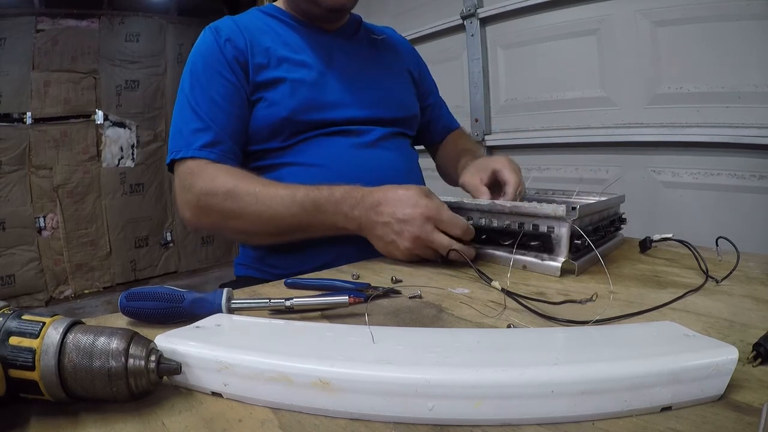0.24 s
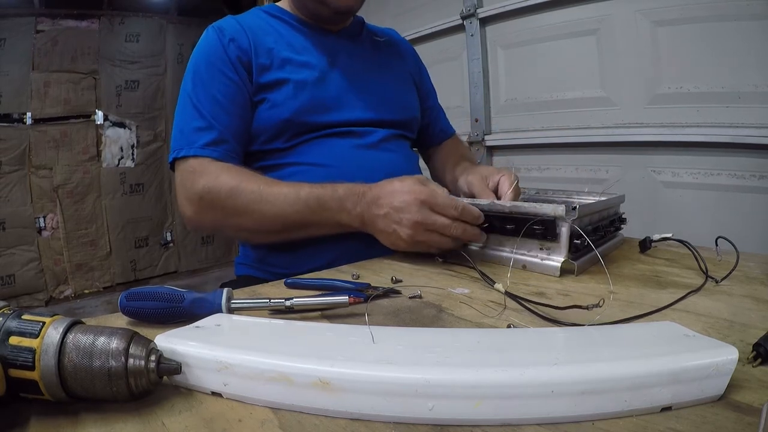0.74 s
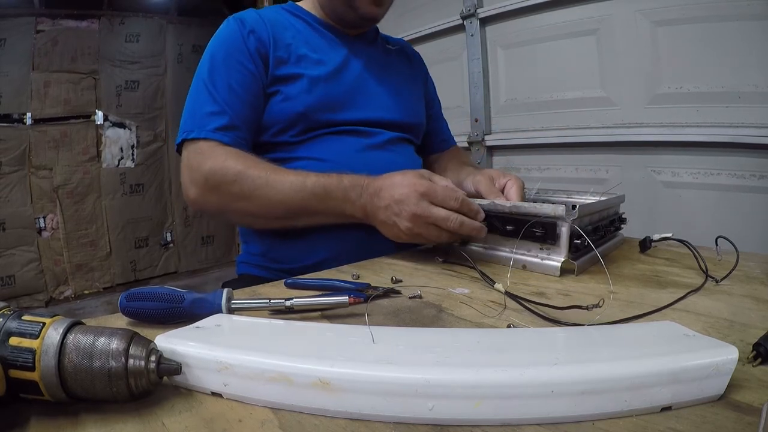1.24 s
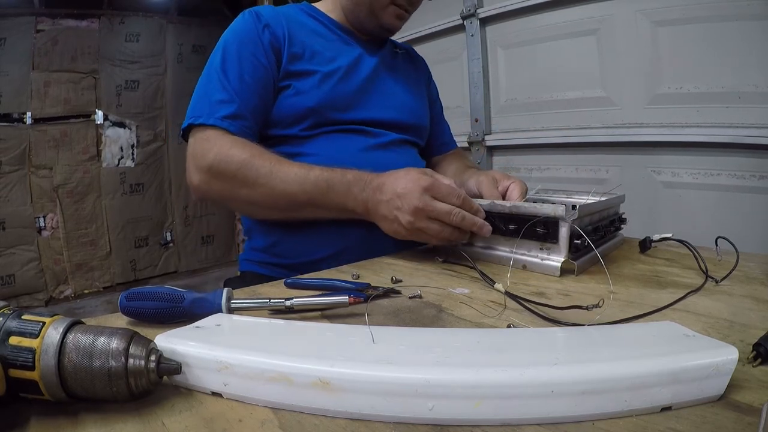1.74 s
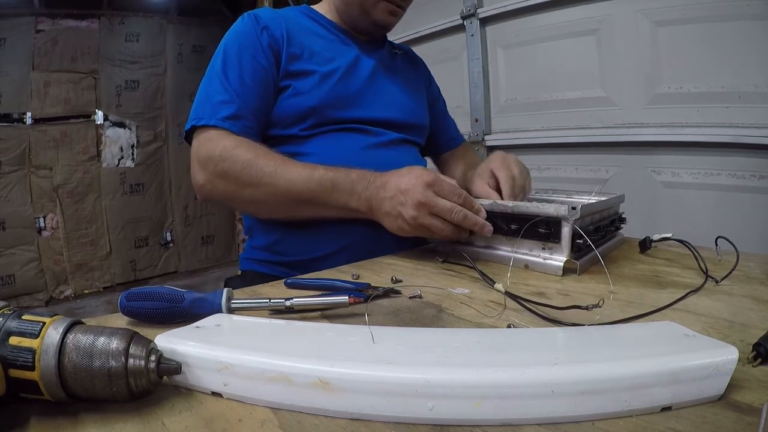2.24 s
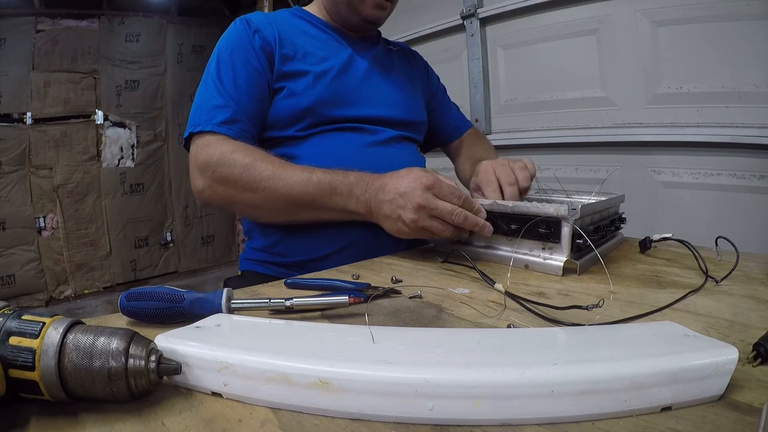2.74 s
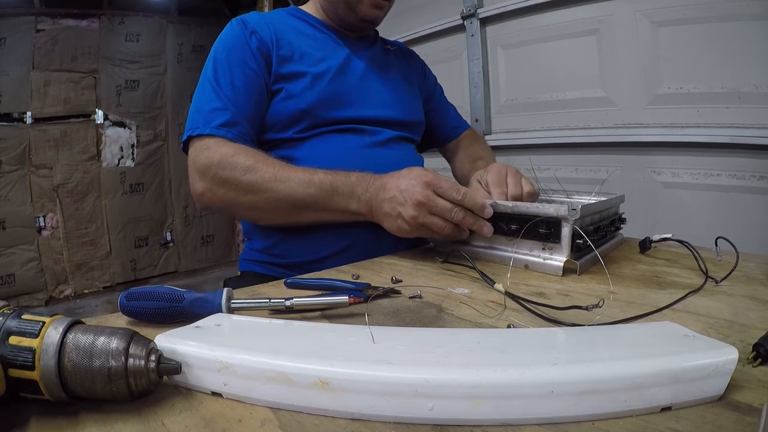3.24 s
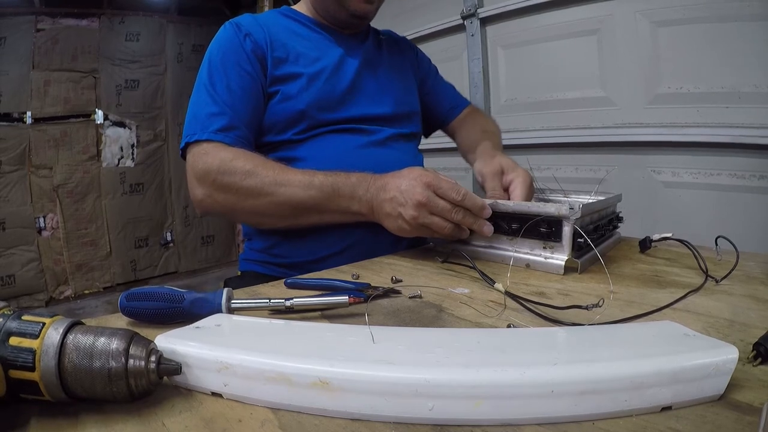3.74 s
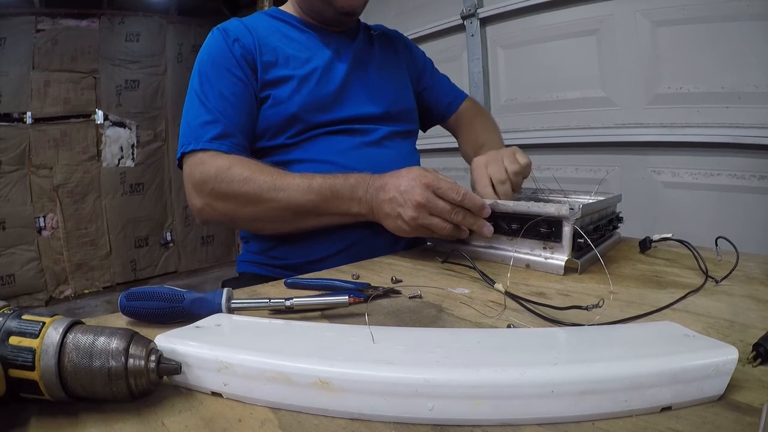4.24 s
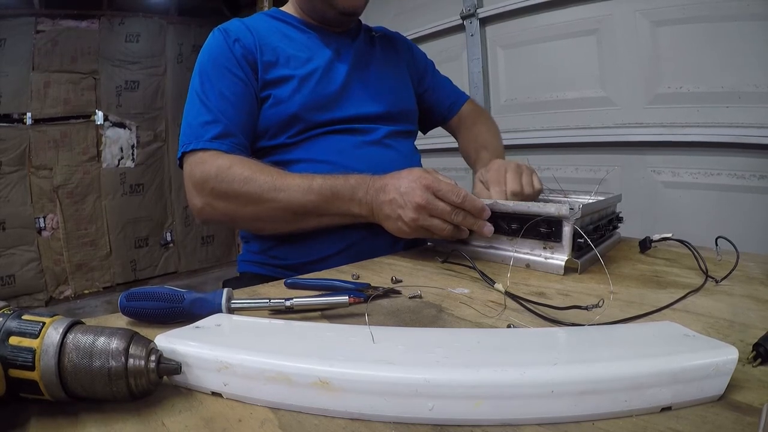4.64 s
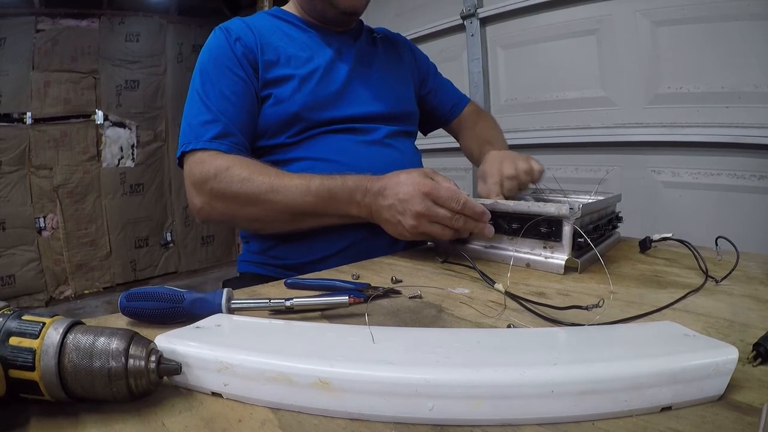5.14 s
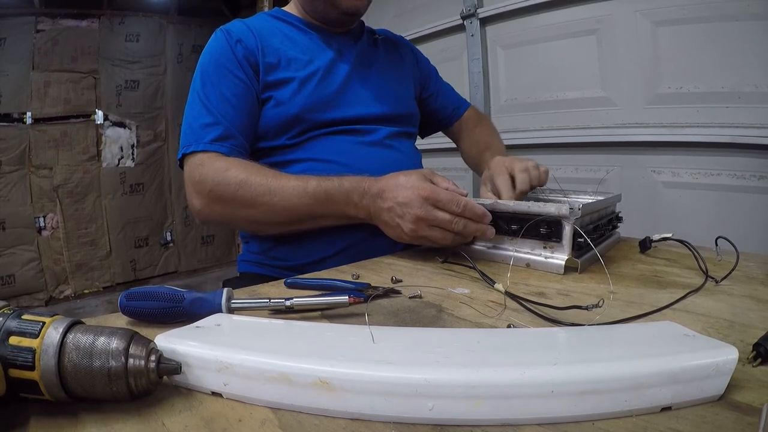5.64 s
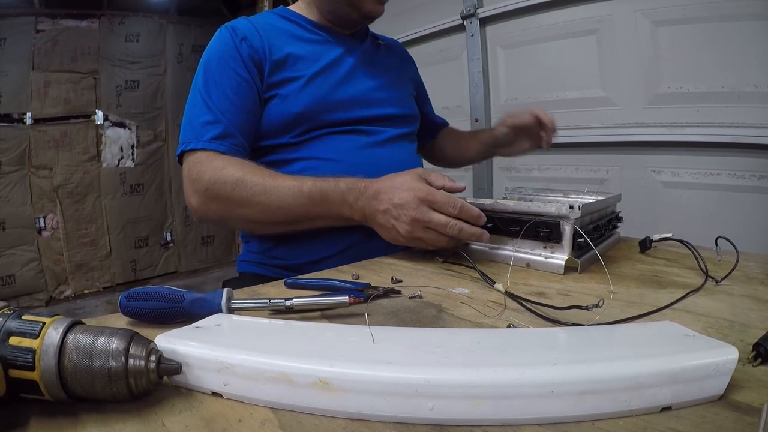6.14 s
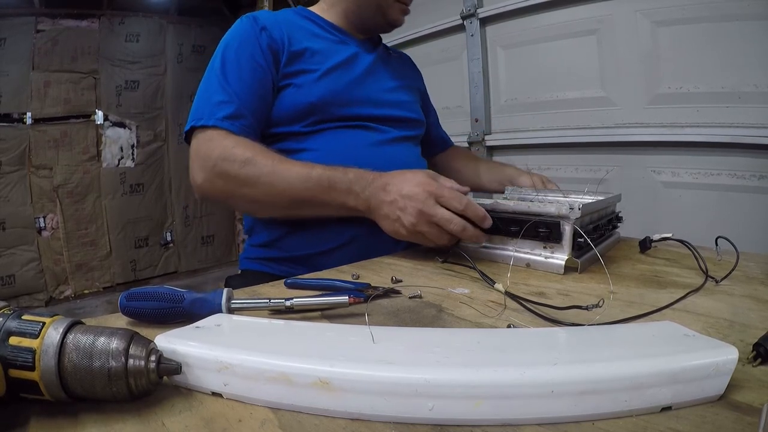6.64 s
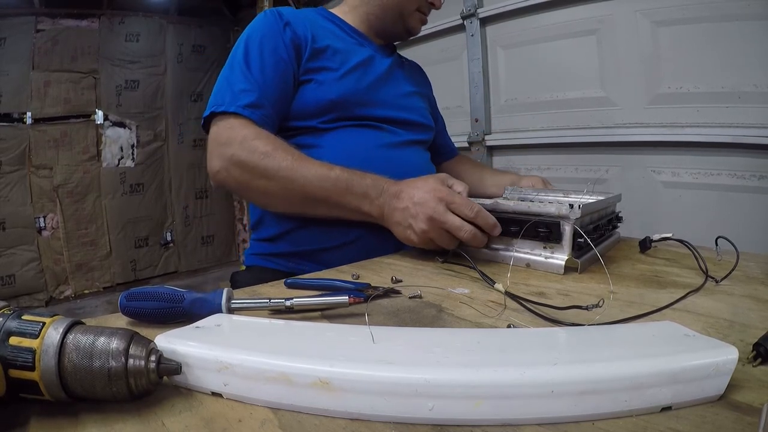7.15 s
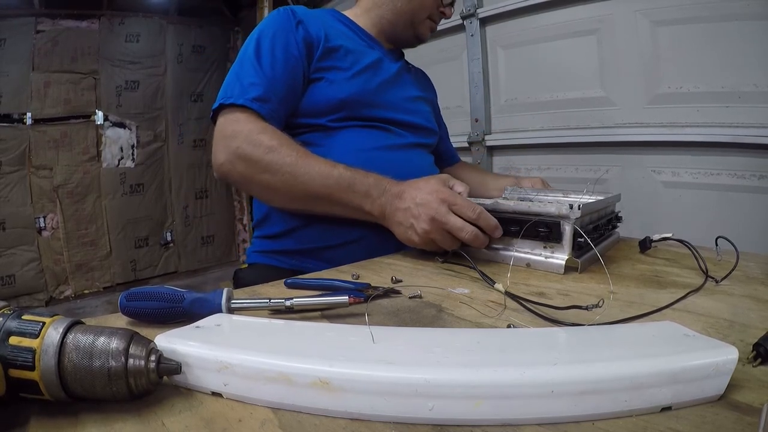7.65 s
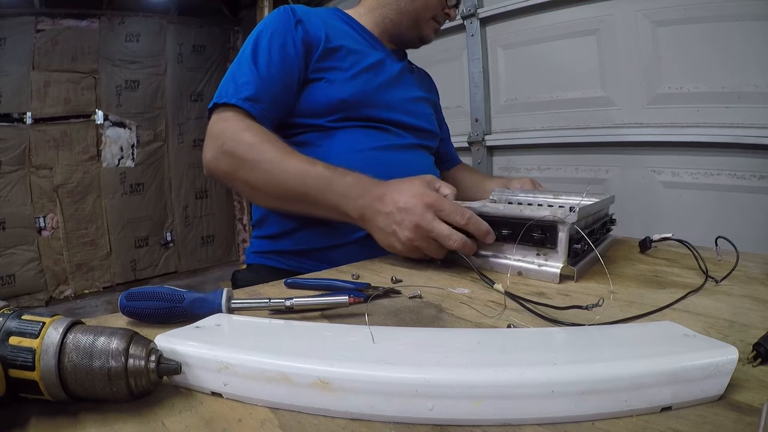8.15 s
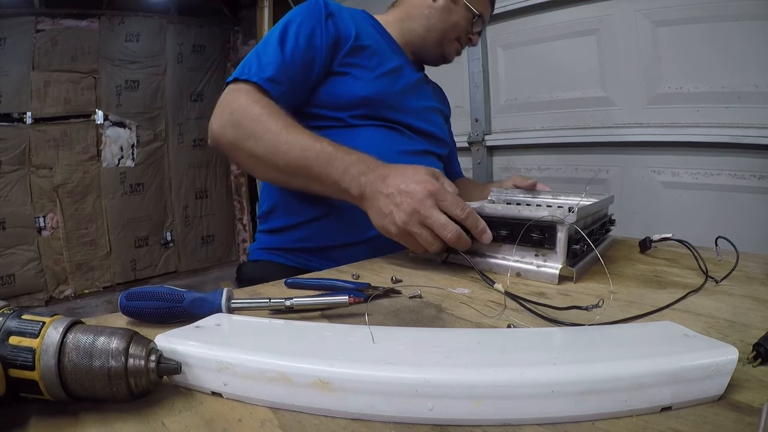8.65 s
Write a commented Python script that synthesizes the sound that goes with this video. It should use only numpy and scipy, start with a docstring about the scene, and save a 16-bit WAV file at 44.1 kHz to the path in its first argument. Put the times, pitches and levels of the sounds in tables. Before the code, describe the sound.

Thin wire and fingers scrape and click on a ringing metal grid box, with soft wooden bench thuds and a late humming drag in a garage.

```python
"""Hands thread thin wire through a metal grid box on a wooden bench in a closed garage.
Wire and skin rub the grid (dense random slips) and click on it (noise cracks), both ringing its modes.
The box bumps on the bench (decaying bench modes) and late on is dragged across it (wavering hum, rumble).
A faint squeak and a faint hum come and go; a low rumble and a faint hiss (coloured noise) lie below.
The two ports of a small microphone on the bench hear it all, with short diffuse echoes."""
import sys
import numpy as np
from scipy import signal
from scipy.fft import rfft, irfft, next_fast_len
from scipy.io import wavfile
from scipy.ndimage import uniform_filter1d, minimum_filter1d, map_coordinates

SR = 44100
rng = np.random.default_rng(int(sys.argv[2]) if len(sys.argv) > 2 else 0)


def output_pcm(signal):
    """Save a mono or channel-first signal as 16-bit PCM at the path in sys.argv[1].

    Samples are clipped to [-1, 1] before scaling.
    """
    pcm = np.clip(np.atleast_2d(signal).T, -1, 1) * 32767
    wavfile.write(sys.argv[1], SR, np.round(pcm).astype(np.int16))


N = 392049
SIZE = next_fast_len(N + SR)
HZ = np.maximum(np.arange(SIZE // 2 + 1) * SR / SIZE, 1)   # frequency axis of the long filters

# Modes of the metal grid box. Each row: frequency in Hz, nominal width in Hz, relative level in dB.
GRID_MODES = [(1035, 14, -5), (1085, 14, -2), (1265, 30, -6), (1545, 26, 1), (1600, 30, 0), (1750, 22, 1),
              (1935, 18, 1), (1988, 20, -5), (2310, 30, -9), (2685, 16, 0), (2790, 25, -4), (3090, 30, -3),
              (3255, 24, -4), (3330, 90, -4), (3420, 22, -4), (3478, 18, -4), (3770, 24, -1),
              (4230, 18, -3), (4520, 45, -2), (4755, 16, -5), (5070, 30, -8), (5230, 26, -7),
              (5450, 27, -9), (6025, 30, -2), (6082, 22, -2), (6245, 40, -3), (6420, 45, -6),
              (6850, 50, -1), (7280, 30, 0), (7700, 70, 0), (8430, 100, 0), (9240, 69, 3),
              (10030, 43, -2.5)]
# Modes of the wooden bench top. Each row: frequency in Hz, nominal width in Hz, relative level in dB.
BENCH_MODES = [(266.4, 14, 0.5), (320.3, 65, 4), (365.2, 75, 3), (446.4, 27, 7), (493.5, 80, 5.5)]
# The whole bench shuddering on its legs. Each row: frequency in Hz, width in Hz, relative level in dB.
LEG_MODES = [(73, 4.4, -23), (160, 4.8, -11)]


def amp(db):
    """Decibels to gain."""
    return 10 ** (np.asarray(db) / 20)


def unit(x):
    """Scaled to rms 1."""
    return x / np.sqrt(np.mean(x ** 2) + 1e-20)


def in_time(rows):
    """Columns of a curve table, one value per sample."""
    s, *columns = np.transpose(rows)
    return [np.interp(np.arange(N) / SR, s, c) for c in columns]


def at_hz(points, hz, column=1):
    """A spectrum table read on a log-frequency axis."""
    points = np.array(points, float)
    return np.interp(np.log(hz), np.log(np.maximum(points[:, 0], 1)), points[:, column])


def shaped(x, response):
    """x through a frequency response given on HZ."""
    return irfft(rfft(x, SIZE) * response, SIZE)[..., :N]


def split(x, low_hz, high_hz):
    """One band of x."""
    return signal.sosfilt(signal.butter(2, [low_hz, high_hz], "band", fs=SR, output="sos"), x)


def drift(rate):
    """Slow chance: random steps of spread 1, rate per second, joined by straight lines."""
    steps = rng.standard_normal(int(N / SR * rate) + 2)
    return np.interp(np.arange(N) / SR * rate, np.arange(len(steps)), steps)


def add(track, s, sound):
    """Mix a sound in at time s."""
    i = int(s * SR)
    track[i:i + len(sound)] += sound[:N - i]


def ring(x, hz, width):
    """One resonance, gain 1 on top."""
    r, w = np.exp(-np.pi * max(width, 3) / SR), 2 * np.pi * hz / SR
    return signal.lfilter([(1 - r * r) / 2, 0, (r * r - 1) / 2], [1, -2 * r * np.cos(w), r * r], x)


def background():
    """Coloured noise, mid and side unrelated, in four bands that waver in level."""
    # Each row: time in seconds, then nominal levels in dB of the low, body and top bands.
    band_levels = [(0.0, -29.5, -28.5, -55), (0.8, -36.5, -29.5, -55.5), (1.6, -42.5, -32, -62),
                   (2.3, -38.5, -27, -58), (3.4, -46, -30.5, -59.5), (3.9, -36.5, -31, -58),
                   (5.0, -41.5, -31.5, -59.5), (5.9, -44.5, -34, -59), (7.0, -57.5, -37.5, -58),
                   (7.699, -58, -33.5, -60.5), (8.3, -55, -49.5, -71.5), (8.55, -46, -56.5, -72),
                   (8.89, -40, -50, -63.5)]
    # Each row: time in seconds, level in dB of the 0.7-1.1 kHz band relative to the body.
    upper_body = [(0, -16), (5.5, -17), (6.8, -18), (8.3, -17.5), (8.6, -9), (8.89, -8)]
    # Spectrum of the noise ahead of the band levels. Each row: frequency in Hz, relative dB.
    floor_colour = [(15, -44.5), (25, -11.5), (59, 3.5), (68, 1), (80, 4), (96, -4.5), (122, -1.5),
                    (135, -1.5), (160, 5), (190, 6), (226, -0.5), (263, 3.5), (300, -3.5), (335, -0.5),
                    (400, -6), (495, -8.5), (598, -22.5), (848, -31), (1300, -32.5), (2100, -43),
                    (3830, -53), (5200, -52), (6200, -50.5), (7200, -51.5), (9810, -54), (12200, -60.5),
                    (13500, -59), (15500, -99.5)]
    # Each row: frequency in Hz, side minus mid in dB ahead of the width.
    side_colour = [(40, 6.5), (55, -10.5), (100, 0.5), (160, -0.5), (280, -10), (480, 2.5), (900, 6.5),
                   (1900, 3), (4000, -2.5), (8000, 2)]
    # Stereo width. Each row: time in seconds, gain of the side.
    side_gain = [(0, 0.68), (8.3, 0.92), (8.45, 0.44), (8.65, 0.16), (8.83, 0.01), (8.87, 0.1)]

    low_db, body_db, top_db = in_time(band_levels)
    upper_db = body_db + in_time(upper_body)[0]
    width = np.clip(in_time(side_gain)[0], 0, 1.5)
    colour = amp(at_hz(floor_colour, HZ))
    mid_side = shaped(rng.standard_normal((2, N)), [colour, colour * amp(at_hz(side_colour, HZ))])
    out = 0
    # band edges in Hz, level in dB, waver in dB
    for low, high, db, waver_db in [(15, 105.0, low_db, 1.0), (113.6, 372, body_db, 0.75),
                                    (673, 1123, upper_db, 1), (2050, 13000, top_db, 0.72)]:
        band = np.sqrt(1 / (1 + (low / HZ) ** 8) / (1 + (HZ / high) ** 8))
        share = shaped(mid_side, band)
        share = share / np.std(share[0]) * amp(db + waver_db * drift(9))
        out = out + share[0] + width * share[1] * [[1], [-1]]
    return out


def faint_hum():
    """A narrow band of noise, from two resonances in a row, swells and goes."""
    # Each row: time in seconds, level in dB.
    swell = [(3.9, -73), (4.3, -63), (4.75, -51), (5.0, -83)]
    hum_hz, width_hz = 650, 28.7   # width of each resonance
    level_db, = in_time([(3.8, -120)] + swell + [(5.1, -120)])
    noise = ring(rng.standard_normal(N), hum_hz, width_hz)
    return amp(level_db) * unit(ring(noise, hum_hz, width_hz))


def squeak():
    """A thin whistle, roughened by fast random pitch and level, slides down and then lingers."""
    # Each row: time in seconds, centre level in dB, centre pitch in Hz.
    whistle = [(5.31, -85, 3250), (5.335, -63, 3150), (5.42, -62, 2830), (5.55, -65, 2600),
               (5.65, -76, 2700), (5.9, -64, 2800), (6.3, -62, 2800), (6.39, -57, 2830), (6.44, -76, 2800),
               (6.52, -62, 2800), (6.68, -60, 2780)]
    level_db, hz = in_time([(5.3, -120, 3400)] + whistle + [(6.72, -120, 2750)])
    phase = 2 * np.pi * np.cumsum(hz + 135 * drift(450)) / SR
    return amp(level_db + 3 * drift(120)) * np.sin(phase)


def drag():
    """Stick-slip drives the bench top: one narrow wavering hum with overtones over a lumpy rumble."""
    # Each row: time in seconds, nominal level in dB, centre pitch of the bench-top hum in Hz.
    drag_moves = [(7.72, -31, 308.3), (7.736, -23, 304.8), (7.754, -37, 309), (7.782, -19, 290.2),
                  (7.796, -22, 286.5), (7.824, -11, 297.6), (7.84, -17.5, 312.3), (7.866, -12.5, 312.2),
                  (7.886, -15, 333.5), (7.908, -10, 318.2), (7.938, -10.5, 298), (7.952, -21, 293),
                  (7.968, -10, 313), (7.996, -13, 326.4), (8.022, -13.5, 326.8), (8.082, -10, 316.3),
                  (8.166, -14, 313.8), (8.186, -11.5, 294), (8.198, -26, 294), (8.21, -12.5, 313.6),
                  (8.226, -18, 329), (8.246, -23, 333), (8.27, -30, 358), (8.292, -39.5, 319.5),
                  (8.33, -39, 323), (8.36, -68, 325)]
    # Swell of the hum's overtones as the box slows. Each row: time in seconds, change in dB.
    rasp = [(7.8, 1), (8.04, -8), (8.11, 4.5), (8.17, 10), (8.22, 0)]
    # Spectrum of the rumble. Each row: frequency in Hz, relative dB.
    rumble_colour = [(24, -64.5), (40, -39), (69, -23.5), (133, -26), (188, -16), (225, -16.5), (316, -9.5),
                     (450, -24), (807, -40), (1220, -40.5), (1400, -56), (1820, -78), (3080, -120)]

    level_db, hum_hz = in_time([(7.69, -99.5, 300)] + drag_moves + [(8.4, -100, 321)])
    phase = 2 * np.pi * np.cumsum(hum_hz + 4.0 * drift(70)) / SR
    hum = amp(1.3 * drift(50)) * np.sin(phase)
    rasp_db = in_time(rasp)[0]
    for harmonic, db in zip((2, 3, 4, 5), (-35, -43, -41, -44)):
        hum = hum + amp(db + rasp_db + 4.5 * drift(30)) * np.sin(harmonic * phase)
    lumpy = rng.standard_normal(N) * amp(2.5 * drift(25))
    rumble = unit(shaped(lumpy, amp(at_hz(rumble_colour, HZ))))
    return amp(level_db) * (amp(2.5) * hum + amp(-8.5) * rumble)


def bumps():
    """A soft push rings the bench modes nearest the pitch centre, each with a strength of its own."""
    # Each row: start in seconds, peak of the bench modes in dB, pitch centre in Hz,
    # T60 in seconds of a decay on top of the modes' own.
    knocks = [(0.03, -17.5, 284, 0.21), (0.497, -13.5, 325, 0.27), (0.615, -22, 342, 0.11),
              (0.715, -11.5, 283, 0.22), (0.754, -12, 400, 0.93), (0.789, -20, 386, 0.3),
              (1.09, -8.5, 330, 0.19), (1.323, -9.5, 303, 0.15), (1.897, -18.5, 287, 0.18),
              (1.919, -12.5, 289, 0.1), (2.108, -22.5, 318, 0.3), (2.206, -23, 250, 0.16),
              (2.98, -32, 274, 0.065), (3.456, -26.5, 325, 0.18), (3.496, -21.5, 235, 0.16),
              (3.594, -19, 338, 0.058), (3.629, -21, 306, 0.38), (3.942, -21.5, 268, 0.17),
              (4.883, -18.5, 286, 0.065), (5.0, -12.5, 290, 0.12), (5.03, -19.5, 267, 0.29),
              (5.249, -30, 267, 0.16), (5.689, -13, 330, 0.1), (5.963, -21, 402, 0.13),
              (6.103, -20, 265, 0.11), (6.287, -24.5, 224, 0.15), (7.006, -25.5, 263, 0.031),
              (7.059, -15.5, 302, 0.16), (7.075, -27, 350, 0.76), (7.201, -18, 324, 0.2),
              (7.47, -27.5, 316, 0.06), (7.558, -23, 327, 0.12), (7.724, -15, 342, 0.11),
              (7.939, -5.5, 260, 0.25), (8.183, -22.5, 262, 0.17)]
    out, t = np.zeros(N), np.arange(12000) / SR
    f, width, mode_db = np.transpose(BENCH_MODES)[:, :, None]
    shudder = sum(amp(db) * np.exp(-np.pi * w * t) * np.sin(2 * np.pi * hz * t) for hz, w, db in LEG_MODES)
    shudder = shudder * (1 - np.exp(-t / 0.041))   # the heavy frame is slow to start
    chance = rng.standard_normal((len(knocks), len(BENCH_MODES), 1))
    for (s, db, centre_hz, t60), spread in zip(knocks, chance):
        near_db = -(np.log2(f / centre_hz) / 0.16) ** 2
        strength_db = mode_db + near_db + 3.0 * spread
        modes = amp(strength_db) * np.exp(-.8 * width * t) * np.sin(2 * np.pi * f * t)
        soft_push = 1 - np.exp(-t / 0.0025)
        sound = modes.sum(axis=0) * amp(-60 * t / max(t60, .02)) * soft_push
        add(out, s, amp(db) * (sound / np.abs(sound).max() + shudder))
    return out


def strokes():
    """Each stroke rises fast, sags while it lasts and dies away; the loudest one counts. Dull and bright dB."""
    # Wire and skin sliding on the grid. Each row: start in seconds, length in seconds, nominal level in dB,
    # treble relative to that level in dB, sag over the stroke in dB.
    slides = [(0.021, 0.04, -46, -17, 0), (0.099, 0.12, -47.5, -4, -5), (0.292, 0.14, -43.5, 6.5, 13),
              (0.473, 0.04, -39, 7, 2), (0.527, 0.1, -37, -0.5, 7.5), (0.65, 0.048, -35.5, -8, 8),
              (0.713, 0.13, -36, 2, 16), (0.902, 0.14, -58.5, 8.5, -2.5), (1.058, 0.015, -49, 1, -2.5),
              (1.13, 0.23, -47, -4, 7), (1.292, 0.025, -39, -7, -9), (1.35, 0.038, -44.5, -10, -0.5),
              (1.423, 0.092, -47.5, -4, 5), (1.782, 0.047, -49, 1.5, 5), (1.903, 0.04, -39.5, -0.5, 5.5),
              (1.989, 0.075, -53, 12.5, -4), (2.124, 0.07, -42, 5, 11), (2.24, 0.11, -45, 2.5, 13),
              (2.457, 0.021, -60, 4, 3), (2.575, 0.05, -48.5, -17, 4.5), (2.724, 0.031, -54, 2, 14),
              (2.83, 0.042, -57, -16, 14), (3.493, 0.14, -48.5, 3.5, -4), (3.69, .012, -58.5, 4, 2.5),
              (3.82, 0.048, -50, 2, 18), (3.939, 0.045, -44.5, -13, 6.5), (4.056, 0.028, -46, 1, 14),
              (4.871, 0.031, -43, -3, 11), (5.003, 0.042, -37, -1.5, 4), (5.257, 0.0099, -59, 8, 18),
              (5.553, 0.057, -59.5, 0, -3.5), (5.699, 0.029, -45.5, -16, 10.5),
              (5.867, 0.076, -56.5, 6.5, 4), (5.957, 0.23, -43.5, 3.5, 1), (6.228, 0.18, -47, 5, 13),
              (6.658, 0.13, -50, 4, -0.5), (6.821, 0.056, -31, 1, 2), (6.872, 0.026, -35, 6.5, -2.5),
              (6.964, 0.2, -36, 1, 16), (7.196, .12, -57, -5, -2.5), (7.421, 0.018, -51, 9, 16.5),
              (7.491, 0.034, -42.5, -2, 16), (7.616, 0.03, -46.5, -4, -3.5), (7.74, 0.027, -32, -1, 15.5),
              (7.774, 0.18, -42, 1.5, -7.5), (7.957, 0.11, -42, 2, 2), (8.074, 0.15, -43, -6.5, 7),
              (8.872, 0.036, -58, 11.5, 2.5)]
    rise_db_per_s, fall_db_per_s = 697, 300
    start, length, db, treble_db, sag_db = np.transpose(slides)[:, :, None]
    t = np.arange(0, N + 64, 64) / SR
    since, length = t - start, np.maximum(length, .005)
    rise = rise_db_per_s * np.minimum(since, 0)
    sag = sag_db * np.clip(since / length, 0, 1)
    fall = fall_db_per_s * np.maximum(since - length, 0)
    shape = db + rise - sag - fall
    return [np.interp(np.arange(N) / SR, t, np.max(shape + tilt, axis=0)) for tilt in (0, treble_db)]


def rub():
    """Dense uneven slips ring the grid, the moving contact favouring other modes in turn, and shake the bench."""
    # Spectrum of the scrape. Each row: frequency in Hz, relative dB.
    scrape_colour = [(500, -26.5), (900, -2.5), (1300, 1), (1800, 0.5), (2250, -0.5), (2800, 1),
                     (3300, -4.5), (4500, 3), (6300, 3.5), (9000, -7), (12000, -18), (15000, -27.5)]
    # The rubbing hand favours the modes of 1.4-2.1 kHz. Each row: time in seconds, change in dB.
    lean = [(0, 0), (1.2, 2), (2.0, 2.5), (3.4, -2), (3.7, -2), (5.0, 0.5), (5.9, -3.5), (6.12, 5),
            (6.3, -4), (6.9, -2.5), (7.3, 0.5), (7.9, -5), (8.2, -0.5)]
    slips_per_s, favour_db, bare_db = 4500, 3.8, -5.5
    damping = 1.6   # fingers on the grid widen its modes

    dull_db, bright_db = strokes()
    sizes = amp(3.0 * np.minimum(rng.exponential(1, N), 5)) * rng.choice([-1, 1], N)
    happens = rng.random(N) < slips_per_s / SR
    slips = unit(sizes * happens * amp(2.2 * np.clip(drift(160), -2, 1.6)))
    coloured = shaped(slips, amp(at_hz(scrape_colour, HZ)))
    dull = amp(dull_db - 4) * unit(split(coloured, 700, 3800))
    bright = amp(bright_db - 5) * unit(split(coloured, 3800, 17000))
    drive = dull - bright

    lean_db, = in_time(lean)
    grid = 0
    for hz, width, db in GRID_MODES:
        mode_db = db + 2.5 + favour_db * drift(30) + lean_db * (1400 < hz < 2100)
        grid = grid + ring(drive * amp(mode_db), hz, damping * width)
    # the heavy bench follows gentle strokes, not the sharp peaks
    shake = np.minimum(amp(dull_db), amp(-44.0)) * split(slips, 40, 508)
    bench = sum(ring(shake * amp(db + 22.0), hz, width) for hz, width, db in BENCH_MODES + LEG_MODES)
    return amp(bare_db) * drive + grid + bench


def clicks():
    """Each click is a short crack of noise that also rings the grid modes, most those near its favoured pitch."""
    # Wire or finger striking the grid. Each row: start in seconds, peak in dB, base colour at 1 kHz in dB,
    # treble colour in dB (before fixed offsets per frequency), favoured pitch in Hz.
    strikes = [(0.0236, -31, -7.5, -17.5, 1610), (0.099, -31, -3, -5.5, 1750),
               (0.147, -32.5, -19, -17, 4440), (0.181, -26.5, -18, -9, 7800),
               (0.286, -32, -7.5, -1.5, 6660), (0.352, -30, -6.5, -12, 6700), (0.431, -30.5, -4, -7, 6600),
               (0.467, -10, -19.5, -3.5, 9100), (0.469, -24, -22, -19.5, 2690),
               (0.4998, -11, -11.5, -23.5, 2100), (0.5024, -6.5, 4.5, -15.5, 3320),
               (0.508, -20, -9.5, -23, 2690), (0.647, -20.5, -6.5, -18.5, 2000),
               (0.7131, -10.5, -8.5, -41, 2080), (0.716, -22.5, -5, -25, 3500),
               (0.7534, -13.5, -9.5, -34, 1470), (0.9864, -39.5, -24, -8, 1660),
               (1.046, -29, -26, -1.5, 3430), (1.0748, -25, -5.5, -14, 5760), (1.087, -21, 1, -6.5, 1600),
               (1.265, -36, -8.5, -6, 3580), (1.296, -29, 5.5, -6.5, 1610), (1.3216, 1.5, -12.5, -17, 3330),
               (1.325, -8, -11.5, -25.5, 2660), (1.8912, -29.5, 3.5, -3.5, 6100),
               (1.974, -37.5, -7.5, 0, 6150), (2.005, -30.5, 1, -8, 6100), (2.1307, -30.5, -8, -13, 1540),
               (2.2326, -38.5, 4, 8, 1570), (2.2842, -31.5, 4.5, 2, 7860), (2.457, -45, -14.5, 1, 4200),
               (2.6275, -40, -25, -6, 3540), (2.7256, -29, -1, -6, 4300), (2.8226, -34, -7, -17.5, 5650),
               (3.0768, -38.5, -6, -20, 1640), (3.15, -48, -2, -18, 3330), (3.491, -46, -29, -13, 4830),
               (3.541, -27.5, -14, -7, 5400), (3.6263, -27.5, -10.5, -8.5, 6800),
               (3.804, -29, -6, -4.5, 5260), (4.0524, -27, -16, -15, 6700), (4.1156, -37.5, -22, -8, 5560),
               (4.169, -39.5, -19.5, -13, 5900), (4.319, -40, -9, -12.5, 1670),
               (4.803, -33.5, -5.5, -5, 6860), (4.865, -33.5, -5.5, -32.5, 4260),
               (4.988, -33, -3, -3, 1570), (5.257, -35.5, -4.5, -7.5, 1540), (5.446, -45, -25, -2, 6100),
               (5.5443, -41, -13, -14, 2430), (5.565, -35.5, -27, -8, 6500), (5.689, -38.5, 11, -28, 2100),
               (5.857, -39, -24, -6, 4370), (5.884, -41, -18, -10, 4370), (5.936, -44.5, -21.5, -20, 6130),
               (5.959, -36, -12, -4, 2730), (6.015, -25.5, -10, 3.5, 7800), (6.035, -34, -12, -6, 6100),
               (6.104, -34.5, 0.5, -15, 1700), (6.061, -34, -3, -18, 2660), (6.1375, -24, -12, -14.5, 4420),
               (6.344, -35.5, -13.5, -5, 5700), (6.6826, -32.5, -12, -6, 4900),
               (6.8127, -9.5, -16, -17, 4410), (6.817, -10, -12, -6, 6050),
               (6.8604, -21.5, -14.5, -20.5, 1900), (6.9, -20.5, -9, -3, 6000), (6.913, -20, -8.5, 0, 1750),
               (6.9638, -34, -17, 2, 6640), (7.0, -36, -15.5, -19, 2740), (7.0554, -25.5, -3, -29, 1570),
               (7.2023, -27.5, -2, -22, 1710), (7.258, -41.5, -20, -21, 3100), (7.309, -36, 2, -13.5, 1820),
               (7.403, -34.5, -2, -12, 6300), (7.4695, -26.5, -12.5, -19, 4570),
               (7.473, -34.5, 1, -19, 1760), (7.5568, -39, 1, -22, 1500), (7.6308, -35.5, -13.5, -12, 4260),
               (7.712, -26, -7, -15.5, 4520), (7.7223, -11, -16, -18, 5960), (7.866, -28.5, -26, -26, 6160),
               (7.934, -27.5, -20.5, -4.5, 7280), (8.113, -34, -5, -22, 1550),
               (8.862, -37.5, -1.5, -11.5, 5940)]
    ring_time = 0.72   # factor on the ring of the modes and the crack's tail
    rise_ms, slower_ms_per_db = 0.2, 0.18   # rise of a -5 dB blow; softer touches rise more slowly
    focus_db, focus_octaves = 3.5, .35   # the colour too is strongest around the favoured pitch
    snap_s, snap_db = .0006, 7   # the first instant of contact

    out, t = np.zeros(N), np.arange(8192) / SR
    hz = np.maximum(np.arange(4097) * SR / 8192, 1)
    f, width, mode_db = np.transpose(GRID_MODES)[:, :, None]
    chance = rng.standard_normal((len(strikes), 2, len(GRID_MODES), 1))
    noise = rng.standard_normal((len(strikes), 8192))
    tones = np.sin(2 * np.pi * f * t)
    decays = np.exp(-5.5 * width * t / ring_time)
    snap = amp(snap_db) * np.exp(-t / snap_s)
    crack_tail = amp(-10) * np.exp(-t / (.03 * ring_time))
    crack_shape = snap + np.exp(-t / .004) + crack_tail
    fade_out = np.minimum(100 * (t[-1] - t), 1) ** 4
    for (s, db, low_db, high_db, near_hz), (spread, turn), hiss in zip(strikes, chance, noise):
        near_db = 12.4 * np.exp(-(np.log2(f / near_hz) / 0.065) ** 2)
        strength = amp(mode_db + 2.2 * spread + near_db)
        modes = np.sum(strength * decays * tones * np.sign(turn), axis=0)
        crack = 3.2 * hiss * crack_shape
        rise = 1 - np.exp(-t * 1000 / max(rise_ms - slower_ms_per_db * (db + 5), .05))
        colour = at_hz([(500, low_db - 3.5), (1000, low_db), (1800, low_db + 2.5), (3500, 0.014),
                        (7000, high_db + 13.5), (10000, high_db - 1.0), (15000, high_db - 15.5)], hz)
        colour = colour + focus_db * np.exp(-(np.log2(hz / near_hz) / focus_octaves) ** 2)
        sound = irfft(rfft((modes + crack) * rise) * amp(colour)) * fade_out
        add(out, s, amp(db) * sound / np.abs(sound).max())
    return out


def ports(x):
    """One source as heard by both ports: level and phase differ with frequency."""
    # Each row: frequency in Hz, phase lead of left over right in radians, left minus right in dB.
    port_response = [(68.6, 4, 6.5), (152, 3.5, -2.5), (219, 4, -0.5), (272, 4.5, -4), (342, 7, 14.5),
                     (386, 3.5, 7), (501.4, 3.5, 5.5), (668, 3, -8), (794, -4, -0.5), (1150, 3, -2.5),
                     (1490, 0, -1), (2050, 2.13, -0.5), (2660, 1.1, -5.5), (3400, 0.24, -4),
                     (4450, 1.1, -8.5), (5900, -1.5, 1), (7850, -1.5, -3), (10960, -0.8, -9)]
    lead = at_hz(port_response, HZ)
    balance = amp(at_hz(port_response, HZ, column=2) / 2)
    pair = np.array([balance * np.exp(.5j * lead), np.exp(-.5j * lead) / balance])
    return shaped(x, pair / np.maximum(np.abs(pair.mean(axis=0)), .38))   # evens out the sum of the ports


def wander(pair):
    """The contact moves about the box: lag and balance between the ports drift."""
    lag_s, pan = 1.1e-5, 1.5   # spread at each port, opposite in sign: seconds, dB
    lag, pan_db = lag_s * SR * drift(12), pan * drift(12)
    return np.array([amp(side * pan_db) * map_coordinates(x, [np.arange(N) + side * lag], order=3)
                     for x, side in zip(pair, (1, -1))])


def garage(x):
    """Diffuse echoes: decaying noise, unrelated at the two ports."""
    t60_s = .33
    t = np.arange(SR // 2) / SR
    tail = rng.standard_normal((2, len(t))) * amp(-60 * t / t60_s) * (1 - np.exp(-t / 0.00015))
    return shaped(x, rfft(tail / np.sqrt(np.sum(tail ** 2) / 2), SIZE))


def scene():
    """Bench sounds, their echoes and the background; the bass comes mostly through the bench, with little echo."""
    hands = clicks() + rub()
    bench = bumps() + drag() + squeak() + faint_hum()
    echoes = amp(-9) * garage(split(hands + bench, 450, 17000))
    return wander(ports(hands)) + ports(bench) + echoes + background()


def record(dry):
    """A limiter eases the gain down just ahead of the highest peaks; the top is cut."""
    limit, limiter_s, cutoff_hz = .97, .012, 16300
    span = int(limiter_s * SR)
    room = limit / np.maximum(np.abs(dry).max(axis=0), limit)
    gain = uniform_filter1d(minimum_filter1d(room, size=2 * span), size=span)
    return signal.sosfilt(signal.cheby2(12, 70, cutoff_hz, fs=SR, output="sos"), gain * dry)


dry = scene()
out = record(dry)
output_pcm(out)
```